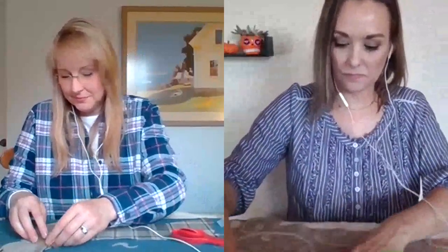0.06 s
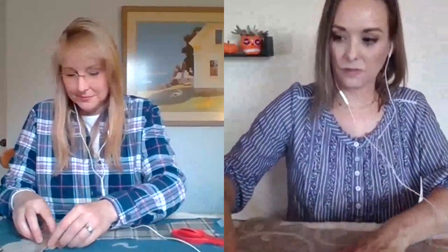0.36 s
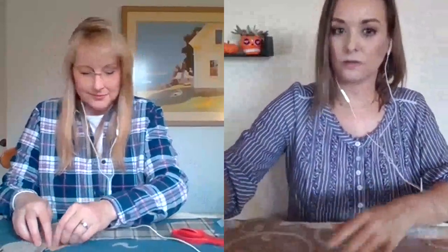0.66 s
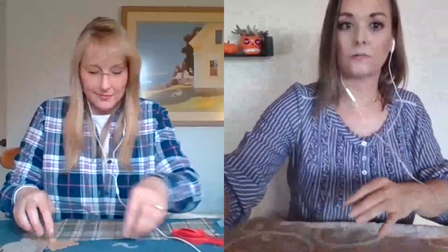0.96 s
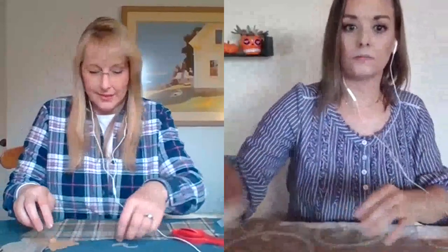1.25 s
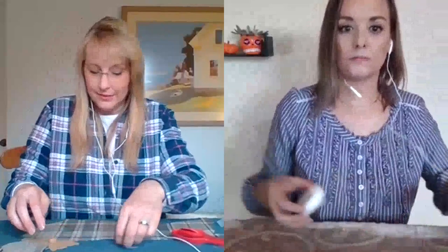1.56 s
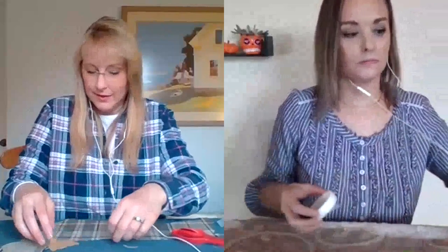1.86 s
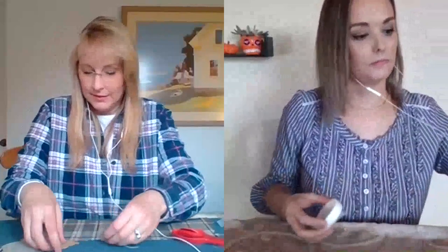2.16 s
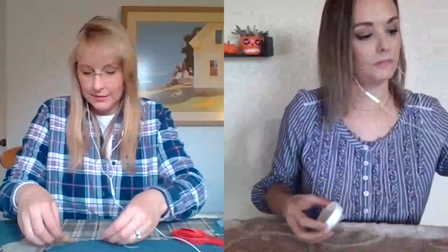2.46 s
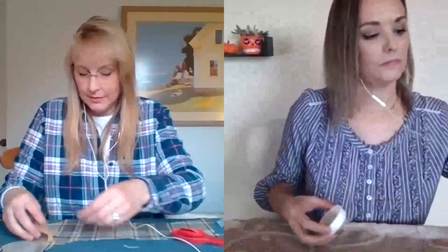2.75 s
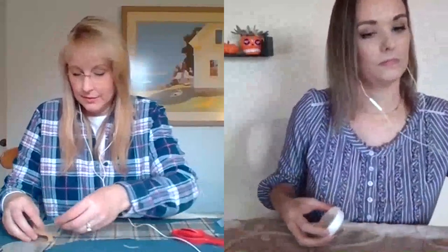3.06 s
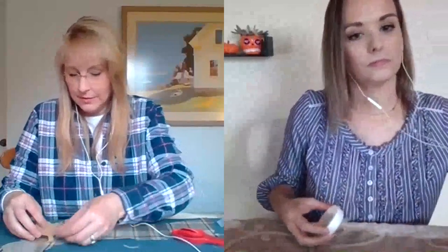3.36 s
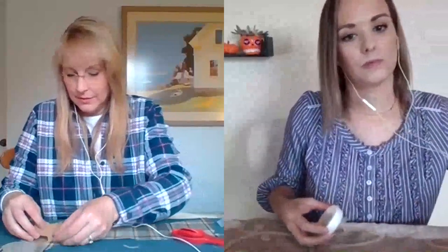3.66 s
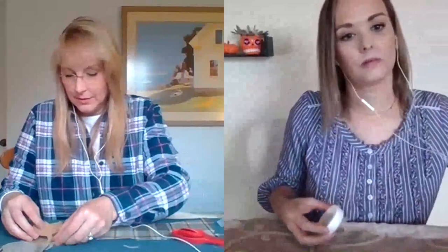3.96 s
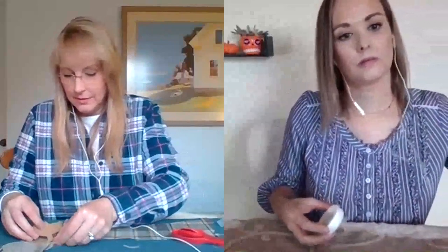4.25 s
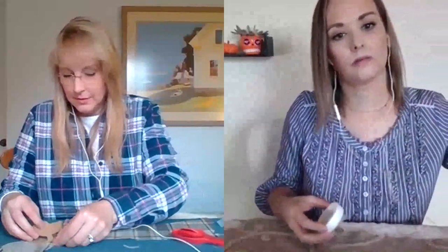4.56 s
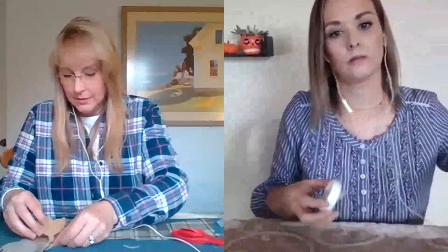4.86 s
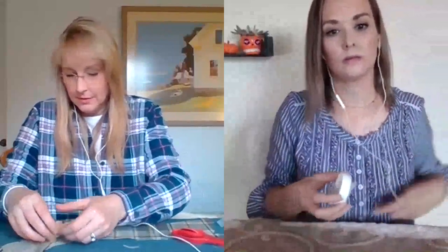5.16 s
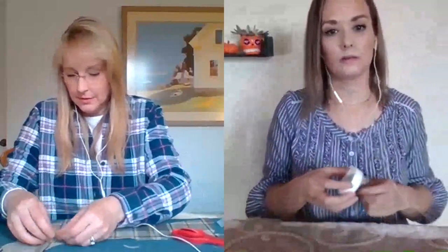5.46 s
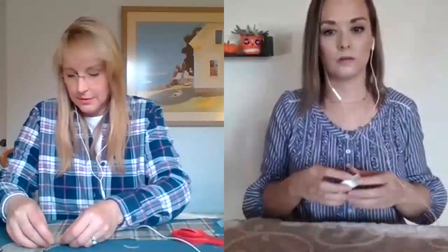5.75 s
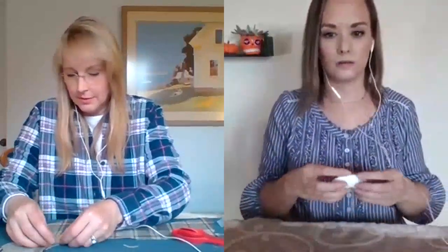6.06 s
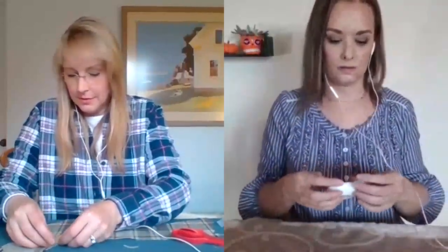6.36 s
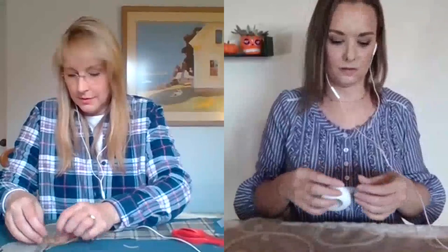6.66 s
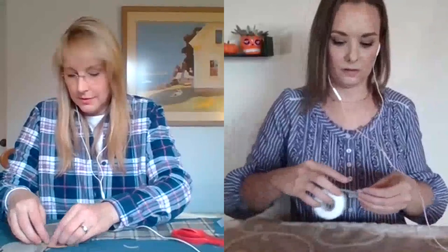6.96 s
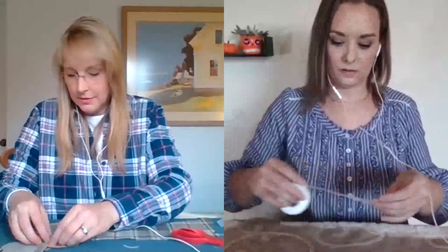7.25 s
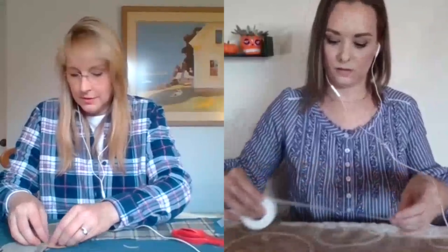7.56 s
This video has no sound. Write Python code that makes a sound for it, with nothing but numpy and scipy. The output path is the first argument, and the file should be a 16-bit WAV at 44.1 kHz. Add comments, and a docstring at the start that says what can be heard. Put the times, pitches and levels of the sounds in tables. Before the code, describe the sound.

A dense run of scratchy rustles and crackles comes from cloth and craft materials brushing close to an earphone microphone. The uneven strokes are mixed with small sharp snaps, dull bumps and the rumble of shifting folds. Toward the end the activity thins to light, occasional handling, leaving faint room noise. The sound is indoors, very near and slightly dulled, as on a video call.

```python
"""Cloth handled at a table

Cloth and craft materials rub close to a small earphone microphone. By stick-slip friction, fibres
crackle, threads pluck the weave and shifting folds rumble; now and then a snag tears loose and knocks
the microphone shell. The rubbing dies down to light handling in a quiet room, all heard through a
narrow-band call line."""
import sys
import numpy as np
from scipy import signal
from scipy.fft import rfft, irfft
from scipy.io import wavfile
from scipy.ndimage import uniform_filter1d, map_coordinates

SR = 44100
rng = np.random.default_rng(int(sys.argv[2]) if len(sys.argv) > 2 else 0)


def output_pcm(signal):
    """Save a mono or channel-first signal as 16-bit PCM at the path in sys.argv[1].

    Samples are clipped to [-1, 1] before scaling.
    """
    pcm = np.clip(np.atleast_2d(signal).T, -1, 1) * 32767
    wavfile.write(sys.argv[1], SR, np.round(pcm).astype(np.int16))


N = 343952
TOP_HZ = 8250  # upper band edge of the call line


def undb(db):
    """Amplitude ratio of a level in decibels."""
    return 10 ** (np.asarray(db) / 20)


def unit(x):
    """Normalisation to an rms of 1."""
    return x / np.sqrt(np.mean(x ** 2) + 1e-18)


def colour(x, points, size=4096):
    """Minimum-phase filter: a causal, quickly dying response through (frequency [Hz], gain [dB]) points."""
    hz, db = np.transpose(points)
    bin_hz = np.arange(size // 2 + 1) * SR / size
    log_gain = np.log(undb(np.interp(np.log(bin_hz + 1), np.log(hz), db)))
    cepstrum = irfft(log_gain)[:size // 2]
    cepstrum[1:] *= 2
    response = irfft(np.exp(rfft(cepstrum, size)))
    return signal.fftconvolve(x, response)[:len(x)]


def wander(per_s):
    """Band-limited fluctuation: random values joined by straight lines, at an rms of 1."""
    knots = rng.standard_normal(N // 10)
    return unit(np.interp(np.arange(N) / SR * per_s, np.arange(len(knots)), knots))


def slips(per_s, spread_db, size=N):
    """Poisson process of tiny slips of either sign: many small, a few large."""
    happens = rng.random(size) < per_s / SR
    sign = rng.choice([-1, 1], size)
    return happens * sign * undb(spread_db * np.minimum(rng.exponential(size=size), 4))


def steady(x, span_s):
    """Energy balance: the hand works evenly, so over a short span the slips sum to a constant power."""
    size = int(span_s * SR)
    power = uniform_filter1d(uniform_filter1d(x ** 2, size), size)
    return x / np.sqrt(np.abs(power) + 1e-9)


def hand_pressure(attack_s=0.014, release_s=0.015, sag_db_per_s=4.5, resting_weight_db=-3):
    """Incoherent addition: resting contact and strokes sum in power to drive fibres and folds, in dB."""
    # cloth resting and brushing on the microphone: (time [s], fibre drive [dB])
    contact = [(0, -40.5), (.3, -37.5), (.62, -38.5), (1.0, -36.5), (1.12, -38), (1.5, -42.5), (1.9, -39),
               (2.9, -35.5), (3.3, -37.5), (4.3, -38), (4.56, -41), (4.85, -40.5), (5.3, -46.5), (5.6, -48),
               (5.8, -52), (6.02, -59), (7.4, -68.5), (7.8, -64.5)]
    # hand strokes: (start [s], duration [s], fibre drive [dB], weight = fold over fibre drive [dB])
    strokes = [(0.087, 0.034, -31.5, 5), (0.148, .078, -31, 3.5), (0.248, 0.062, -38, 5),
               (0.32, 0.078, -33, 5), (0.423, 0.1, -32.5, 2.5), (0.656, 0.05, -28.5, 0.5),
               (0.719, 0.085, -33.5, -2), (0.792, .026, -28, 5.5), (0.826, 0.064, -33, 3.5),
               (.915, .04, -33, 2), (1.161, 0.042, -30, -5), (1.199, 0.038, -32.5, 4.5),
               (1.241, 0.092, -34.5, 3), (1.333, 0.13, -35.5, -4), (1.519, .026, -35.5, -2),
               (1.598, .12, -35.5, -2.5), (1.731, .055, -33.5, 2), (1.992, 0.15, -33, 0),
               (2.272, 0.053, -38, 0.5), (2.334, 0.2, -36, 2), (2.515, 0.029, -28.5, 6.5),
               (2.556, 0.1, -28, 6.5), (2.674, 0.094, -30, 5), (2.787, 0.051, -38.5, 6),
               (2.904, 0.061, -32, 1.5), (2.964, .09, -30, 4), (3.087, 0.2, -37, 0.5),
               (3.343, .066, -34, 5), (3.456, .025, -32, 7), (3.478, 0.072, -27, 1),
               (3.553, .12, -36, -0.5), (3.683, 0.053, -34.5, 2.5), (3.958, 0.22, -40, -5),
               (4.02, .032, -34, 9), (4.352, 0.049, -35.5, 4.5), (4.452, .03, -32.5, 2.5),
               (4.48, 0.021, -44.5, 10), (4.605, 0.078, -33.5, 1), (4.68, .08, -34.5, -0.5),
               (4.755, .09, -45, 7.5), (4.913, 0.064, -37.5, 4.5), (4.984, 0.025, -36, 10.5),
               (5.077, .018, -37, -4), (5.116, .034, -43, 11), (5.381, 0.072, -54, 10),
               (5.49, 0.033, -38.5, -1), (5.633, 0.12, -46.5, 5), (5.836, .133, -52.5, 1),
               (6.053, .1, -53.5, 3), (6.164, 0.15, -51.5, -3), (6.323, .118, -57, 8.5),
               (6.477, 0.034, -48.5, -7), (6.628, 0.041, -58.5, 5), (6.696, .035, -54.5, 11),
               (6.803, 0.14, -63, 10.5), (7.019, 0.18, -65, 11.5), (7.253, 0.039, -55, 10.5),
               (7.661, 0.077, -62.5, -14)]
    t = np.arange(N) / SR
    fibre_power = undb(np.interp(t, *np.transpose(contact))) ** 2
    fold_power = fibre_power * undb(resting_weight_db) ** 2
    for start, length, db, weight_db in strokes:
        span = slice(int(start * SR), int((start + length + 10 * release_s) * SR))
        since = t[span] - start
        take_hold = np.clip(since / attack_s, 0, 1)
        ease_off = undb(db - sag_db_per_s * (since - length / 2))
        let_go = np.exp(-np.maximum(since - length, 0) / release_s)
        push = take_hold * ease_off * let_go
        fibre_power[span] += push ** 2
        fold_power[span] += (push * undb(weight_db)) ** 2
    return 10 * np.log10(fibre_power), 10 * np.log10(fold_power)


def rubbing(fibre_db, fold_db):
    """Stick-slip friction at three scales: a shifting fold drags threads, and each thread drags fibres."""
    # spectra of one fibre, thread and fold letting go: (frequency [Hz], relative level [dB])
    fibre_spectrum = [(200, -27), (800, -0.5), (1700, 1.5), (3000, -1), (4500, -3), (6000, -4.5),
                      (7300, -13.5)]
    thread_spectrum = [(100, -10), (270, 2), (480, 4), (800, 1), (1300, -4.5), (2200, -15), (4000, -24),
                       (7500, -17.5)]
    fold_spectrum = [(20, -35), (40, -33), (60, 0.5), (85, 2), (150, 2.5), (260, -3), (420, -8.5),
                     (800, -28), (2000, -33), (7500, -50.5)]
    # spectrum of fibre tips barely brushing: (frequency [Hz], relative level [dB])
    tip_spectrum = [(1500, -25), (3800, -6.5), (4800, -3.5), (7000, 4.5), (8300, -15.5), (11000, -60.5)]
    press_db = fibre_db - fibre_db.max()
    pace = undb(0.25 * press_db)  # a lighter touch makes fewer slips
    grip = undb(1.1 * wander(per_s=150) + 2.14 * wander(per_s=520))  # uneven grip makes spurts
    folds = unit(slips(per_s=280 * pace, spread_db=3.36))
    threads = unit(unit(slips(per_s=1900 * pace, spread_db=2.6)) + 0.32 * folds)
    fibres = unit(unit(slips(per_s=9000 * pace, spread_db=2.4)) + 0.54 * threads)
    crackle = colour(fibres * grip, fibre_spectrum + [(TOP_HZ, -20), (SR / 4, -60)])
    rasp = colour(threads * grip, thread_spectrum)
    rumble = colour(folds * grip, fold_spectrum)
    hiss = colour(rng.standard_normal(N) * grip, tip_spectrum)
    rasp_db = fibre_db + 0.35 * (fold_db - fibre_db) - 0.32  # a heavier stroke rasps more
    hiss_db = fibre_db - 0.18 * press_db - 16  # fades less than the rest: a light touch is brighter
    return (steady(crackle, span_s=0.022) * undb(fibre_db - 2.83)
            + steady(rasp, span_s=0.026) * undb(rasp_db)
            + steady(rumble, span_s=0.049) * undb(fold_db + 0.5)
            + steady(hiss, span_s=0.045) * undb(hiss_db))


def flexing(x, depth_db, width_hz, per_s):
    """Time-varying resonance: as cloth flexes, peaks and dips come and go, wider towards the treble."""
    hz, times, frames = signal.stft(x, SR, nperseg=256)
    field = rng.standard_normal((200, 2000))
    warped_hz = 2000 * np.log1p(hz / 2000)
    grid = np.meshgrid(warped_hz / width_hz, times * per_s, indexing="ij")
    peaks = map_coordinates(field, grid, order=3, mode="mirror")
    return signal.istft(frames * undb(depth_db * peaks), SR)[1][:len(x)]


def room_air(level_db=-58):
    """Ambient noise: the faint, dull air of a small room, wavering slightly in level."""
    # spectrum of the room air: (frequency [Hz], relative spectral density [dB])
    air_spectrum = [(20, -11), (50, -1.5), (85, 4), (150, 0), (230, -2), (350, 2), (950, -14.5),
                    (1400, -20), (1900, -12.5), (4200, -34.5), (7300, -36)]
    air = unit(colour(rng.standard_normal(N), air_spectrum + [(SR / 4, -60)]))
    return air * undb(level_db + 0.8 * wander(per_s=10))


def snags(rows, swell_s=0.0018, neutral_treble_db=-6, size=6000):
    """Impulsive excitation: a caught thread tears free in a run of slips and rings the microphone shell."""
    # damped modes of the shell and its cable: (frequency [Hz], relative level [dB], 60 dB decay time [s])
    shell_modes = [(84, -8, 0.13), (138, 6, 0.017), (266, 3.5, 0.017), (397, -7.5, .012)]
    mode_hz, mode_db, mode_t60 = np.transpose(shell_modes)[:, :, None]
    out = np.zeros(N + size)
    t = np.arange(size) / SR
    swell = np.exp(-(t / swell_s - 1.26) ** 2 / 2)
    since_knock = np.maximum(t - 0.89 * swell_s, 0)  # the knock starts near the height of the swell
    # spectrum of a thread snapping free: (frequency [Hz], relative level [dB])
    snap_spectrum = [(60, -7), (250, 6.5), (600, 2.5), (1200, -5), (3000, -9.5), (5000, -16.5), (7300, -21)]
    for time, snap_db, treble_db, knock_db in rows:
        tilt_db = treble_db - neutral_treble_db  # taut threads snap brighter
        tilted = [(hz, db + tilt_db * np.clip(np.log2(hz / 1100) / 2, 0, 1)) for hz, db in snap_spectrum]
        burst = slips(per_s=7000, spread_db=1.9, size=size) * swell
        snap = unit(colour(burst, tilted + [(SR / 4, -50)])) * np.sqrt(np.mean(swell ** 2))
        # the cloth loads the shell anew each time
        loaded_hz = mode_hz * np.exp(0.14 * rng.standard_normal(mode_hz.shape))
        decay = undb(mode_db - 60 * since_knock / mode_t60)
        knock = np.sum(decay * np.sin(2 * np.pi * loaded_hz * since_knock), axis=0)
        knock *= rng.choice([-1, 1]) / np.abs(knock).max()
        start = int(time * SR)
        out[start:start + size] += undb(snap_db - 1.55) * snap + undb(knock_db + 2.5) * knock
    return out[:N]


def small_snags(fibre_db, per_s=13):
    """Random point process: rows for lesser snags, whose strength follows the rubbing at that moment."""
    rows = []
    for position, tautness in rng.random((int(per_s * N / SR), 2)):
        drive_db = fibre_db[int(position * N)]
        treble_db = -9 + 8 * tautness
        rows.append((position * N / SR, drive_db + 2.5, treble_db, drive_db - 1))
    return rows


def scene():
    """Superposition: rubbing and snags pass through the same flexing cloth and add to the room air."""
    # snags tearing loose, in relative levels: (time [s], snap [dB], treble [dB], knock [dB])
    main_snags = [(0.015, -26, -9, -31), (0.103, -16, -4, -23), (.12, -20.5, -14, -20),
                  (.167, -16.5, -8, -16.5), (0.231, -18, -6, -15.5), (.51, -22.5, -2, -20.5),
                  (0.639, -24, -26, -23), (.7, -23, -5, -17), (.764, -15.5, 3.5, -11.5),
                  (0.808, -17, -6, -11.5), (.814, -19.5, -2, -22), (.948, -22.5, 5, -25),
                  (1.228, -17.5, -2, -24), (1.318, -29, -19, -22), (1.434, -21.5, -12, -25),
                  (1.523, -28, 6, -31), (1.582, -26, -4, -50), (1.707, -27, -13, -46),
                  (1.971, -23, 6.5, -20.5), (2.174, -16, -1.5, -16), (2.389, -25, -4, -28),
                  (2.462, -20, -7, -18.5), (2.528, -12, -8, -17), (2.566, -19, -10, -17),
                  (2.608, -14, -20, -11.5), (2.681, -22, -27, -15), (2.72, -22, 3, -26.5),
                  (2.907, -25, 6, -23), (2.931, -29, 4, -40), (3.505, -15.5, -8, -25), (3.54, -17, -5, -14),
                  (4.181, -25, -13, -30), (4.392, -21.5, -15, -33), (4.432, -22.5, -6, -21),
                  (4.625, -32, 1, -33), (4.641, -22, -5, -20), (4.913, -25, -2, -21),
                  (4.926, -23.5, -9, -41), (5.001, -25, -9, -15.5), (5.084, -26.5, -6, -40),
                  (5.099, -26, -1, -40), (5.253, -28.5, -7, -40), (5.357, -31.5, -6, -33),
                  (5.395, -35.5, -2, -22), (5.436, -32.5, -10, -26), (5.545, -32, -13, -24),
                  (5.73, -50, -6, -38), (6.061, -42.5, 2, -38), (6.292, -40.5, -2, -26.5),
                  (6.355, -37, -14, -40), (6.431, -39.5, -7, -32), (6.445, -39, -18, -48),
                  (6.878, -48, 4, -40), (7.058, -42.5, -11, -55), (7.438, -46.5, -12, -47),
                  (7.602, -48, -5, -45), (7.776, -59, -10, -39)]
    fibre_db, fold_db = hand_pressure()
    rub = rubbing(fibre_db, fold_db)
    rub = flexing(rub, depth_db=1.5, width_hz=634, per_s=110)  # broad, quick changes as the contact moves
    tears = snags(main_snags + small_snags(fibre_db))
    cloth = flexing(rub + tears, depth_db=2.0, width_hz=149.6, per_s=30)  # small taut patches ring
    return (cloth + room_air())[None]


def record(dry, bass_hz=48, rolloff_hz=7600):
    """Band limiting: the call line drops the deepest bass, rolls off the treble and cuts at its edge."""
    bass_cut = signal.butter(4, bass_hz, "highpass", fs=SR, output="sos")
    rolloff = signal.firwin(121, rolloff_hz, fs=SR)[None]
    band_edge = signal.ellip(10, 0.1, 80, TOP_HZ, fs=SR, output="sos")
    thinned = signal.sosfilt(bass_cut, dry)
    dulled = signal.fftconvolve(thinned, rolloff, mode="same", axes=1)
    return signal.sosfilt(band_edge, dulled)


dry = scene()
out = record(dry)
output_pcm(out)
```